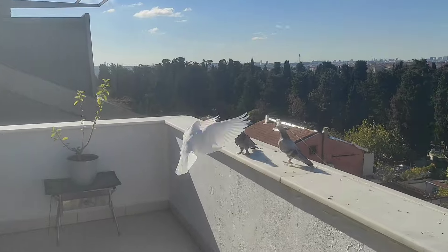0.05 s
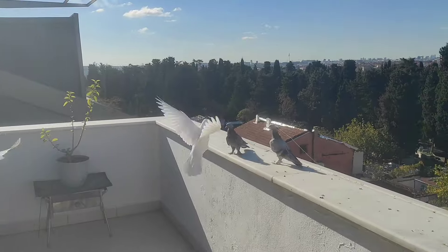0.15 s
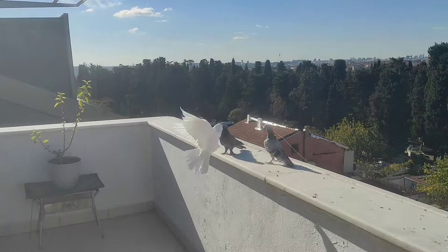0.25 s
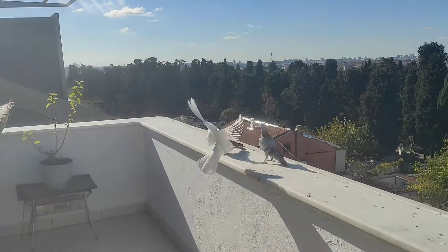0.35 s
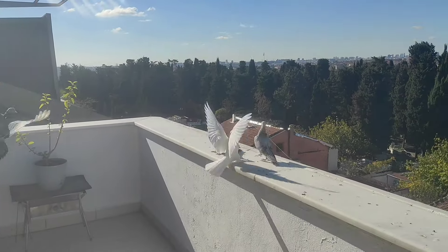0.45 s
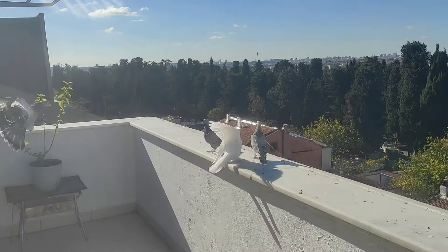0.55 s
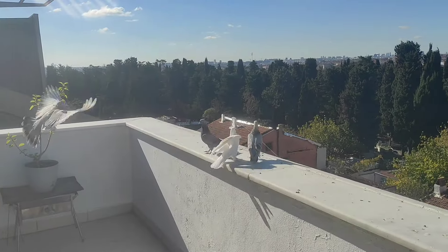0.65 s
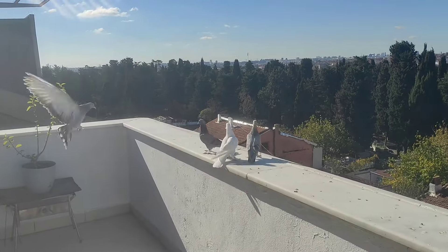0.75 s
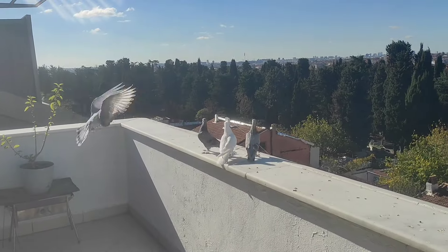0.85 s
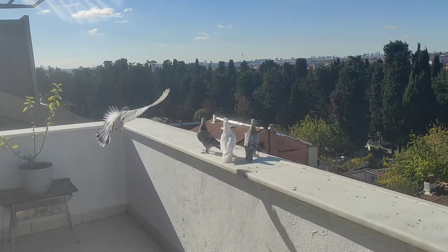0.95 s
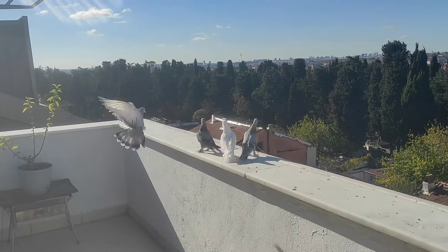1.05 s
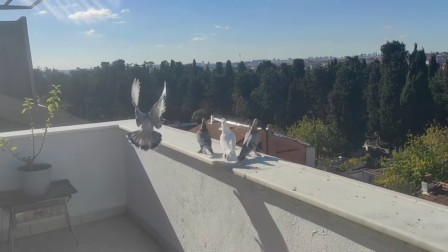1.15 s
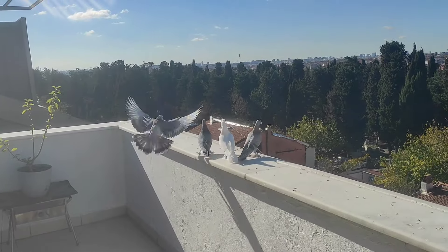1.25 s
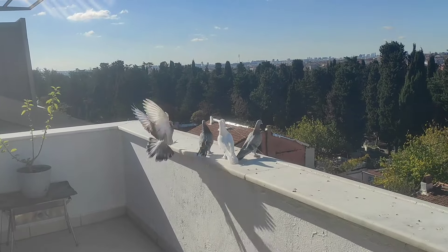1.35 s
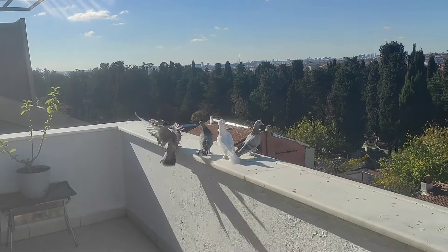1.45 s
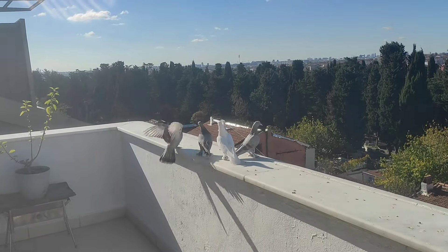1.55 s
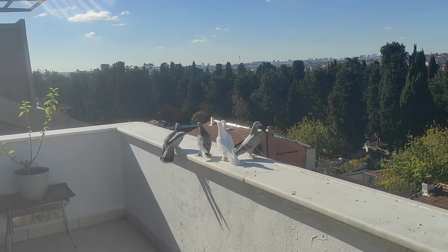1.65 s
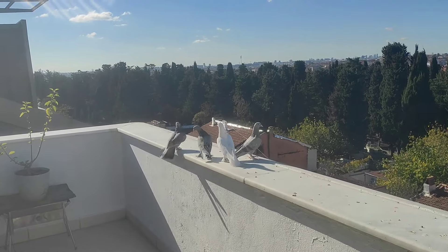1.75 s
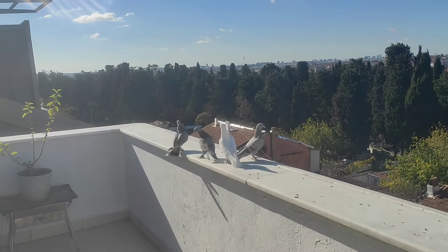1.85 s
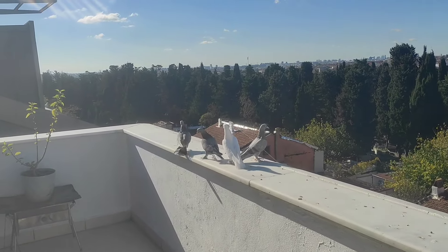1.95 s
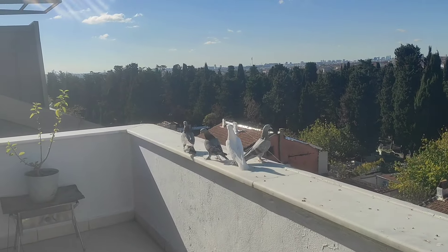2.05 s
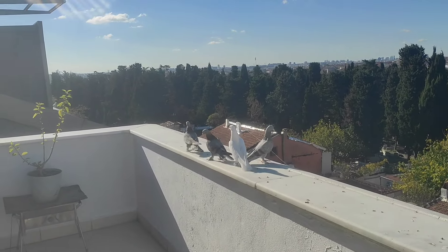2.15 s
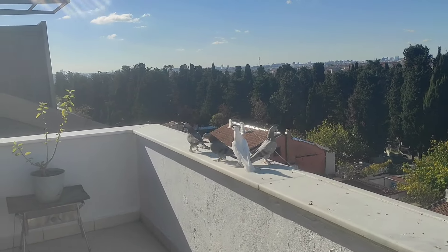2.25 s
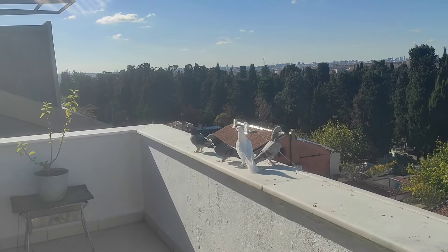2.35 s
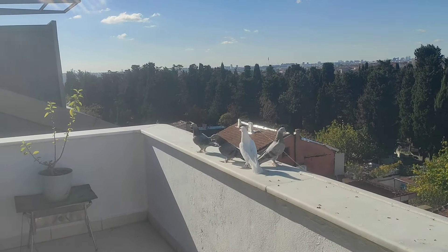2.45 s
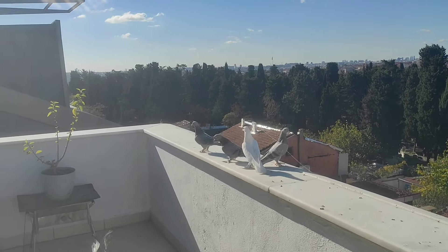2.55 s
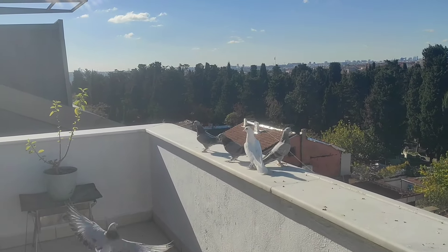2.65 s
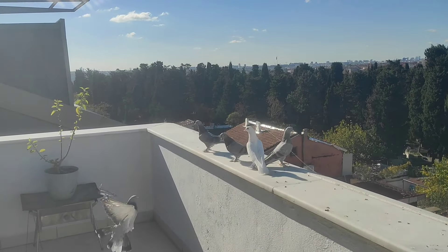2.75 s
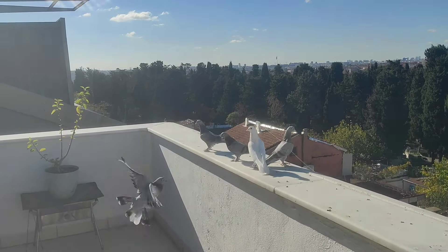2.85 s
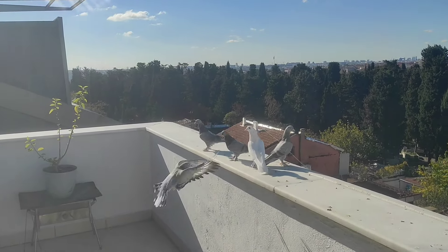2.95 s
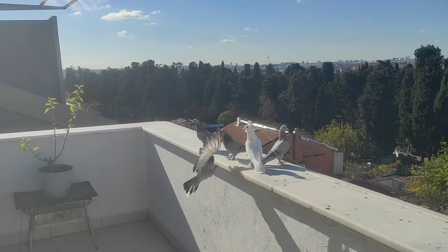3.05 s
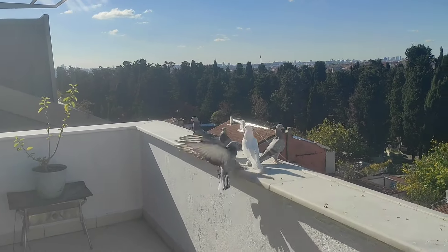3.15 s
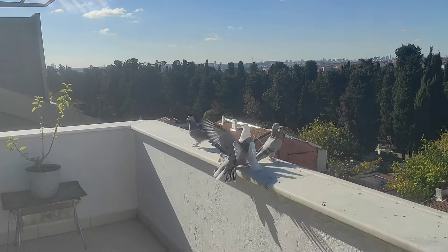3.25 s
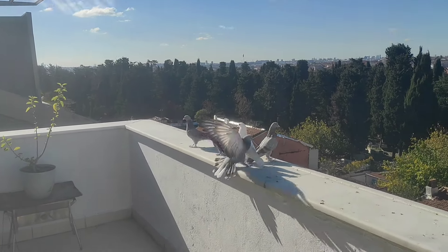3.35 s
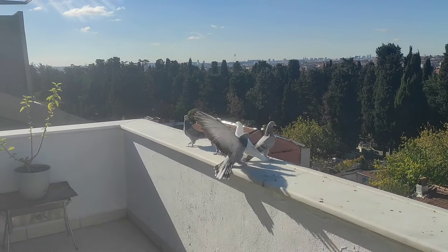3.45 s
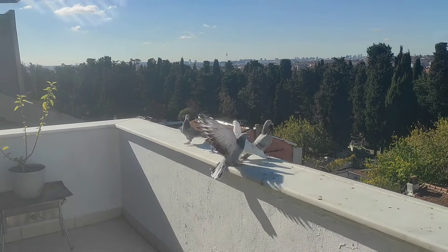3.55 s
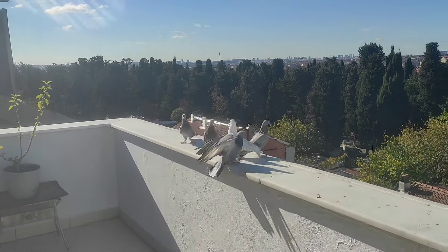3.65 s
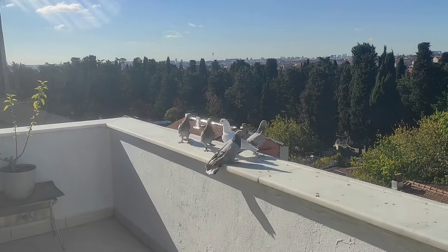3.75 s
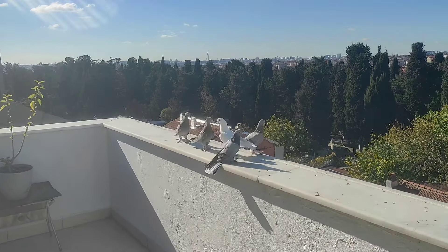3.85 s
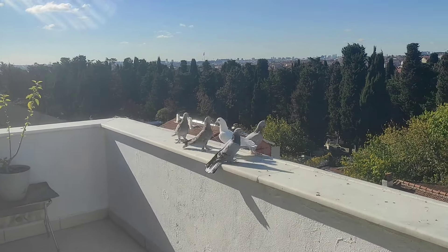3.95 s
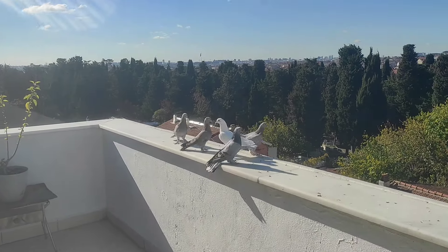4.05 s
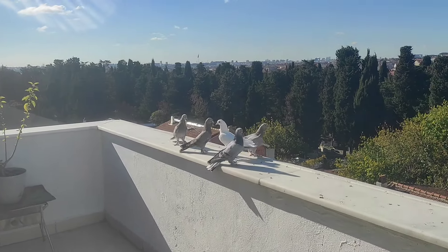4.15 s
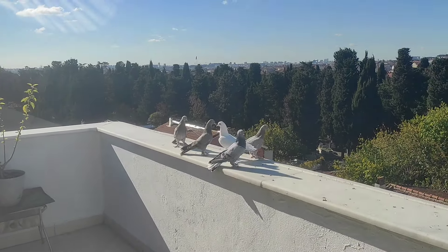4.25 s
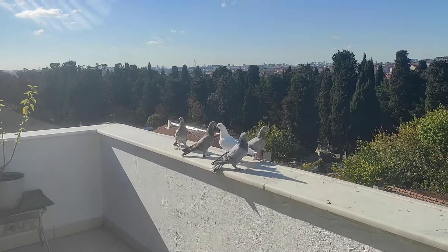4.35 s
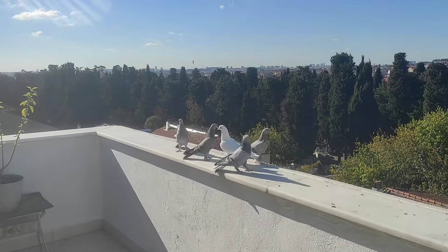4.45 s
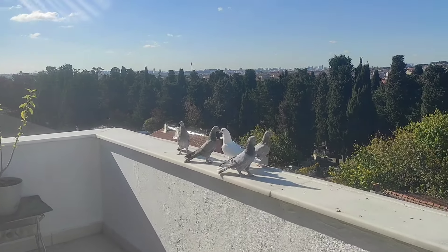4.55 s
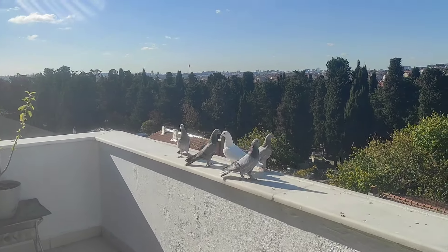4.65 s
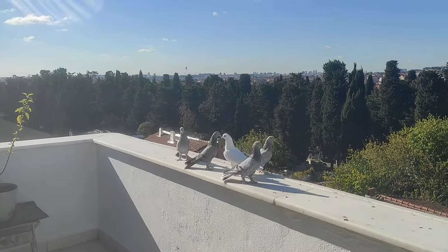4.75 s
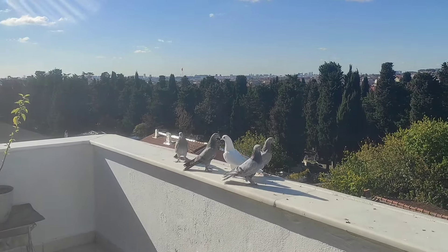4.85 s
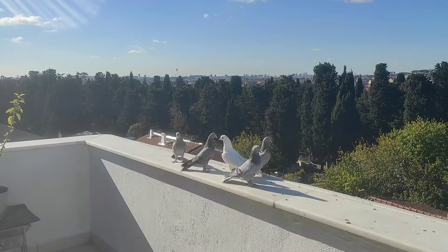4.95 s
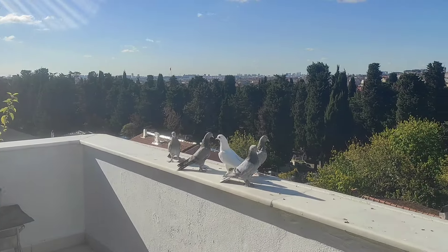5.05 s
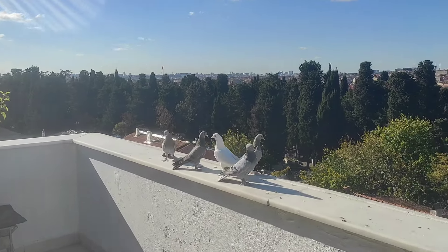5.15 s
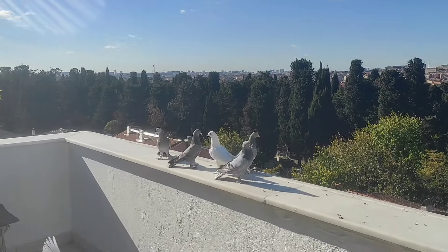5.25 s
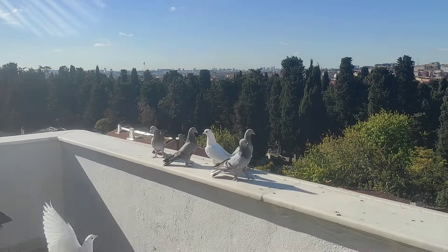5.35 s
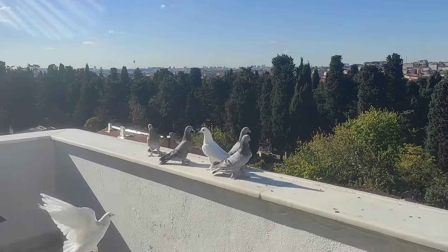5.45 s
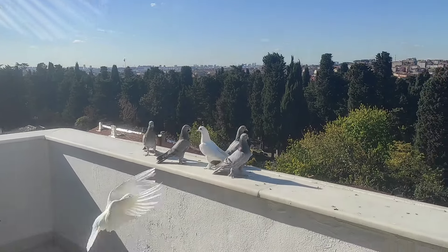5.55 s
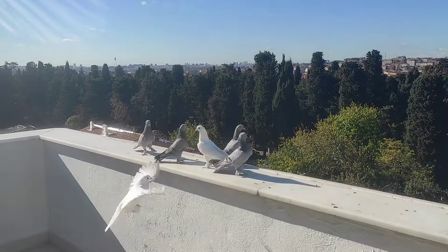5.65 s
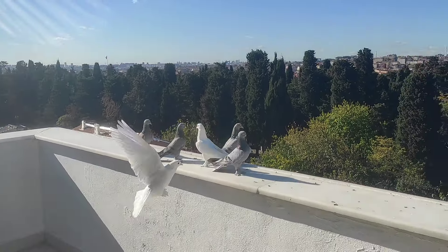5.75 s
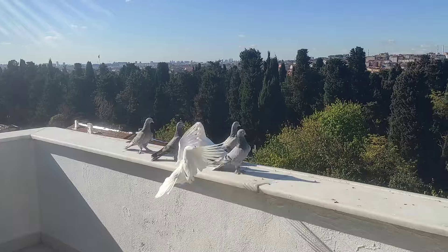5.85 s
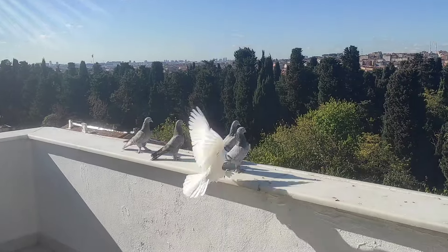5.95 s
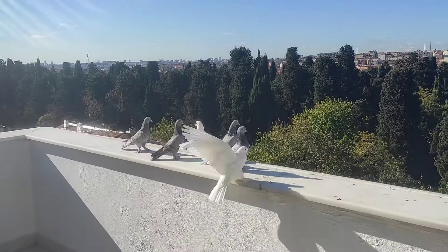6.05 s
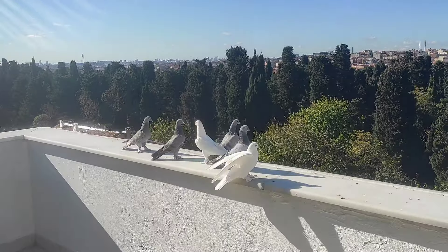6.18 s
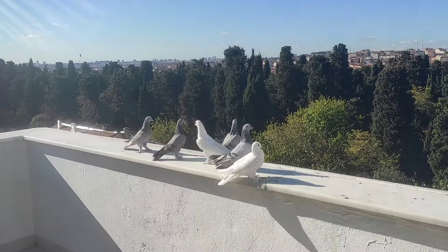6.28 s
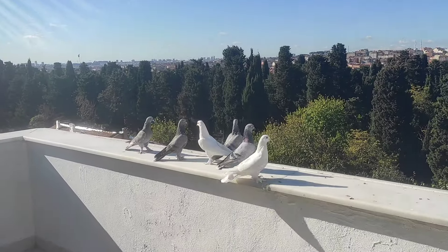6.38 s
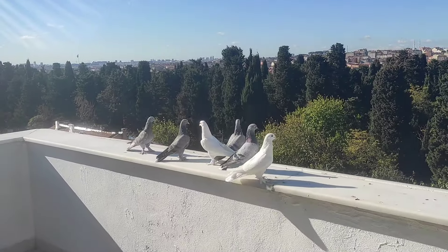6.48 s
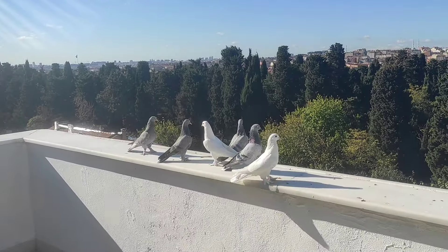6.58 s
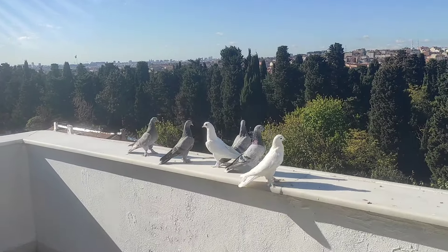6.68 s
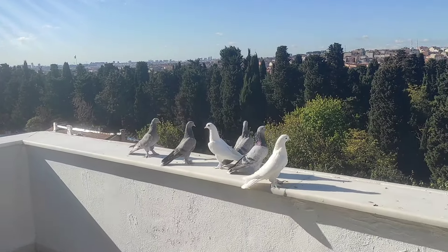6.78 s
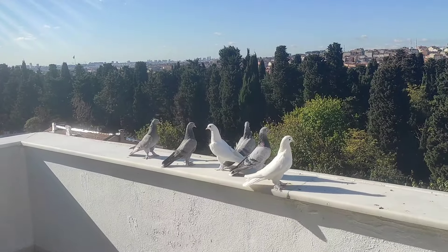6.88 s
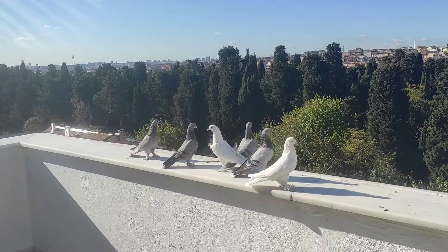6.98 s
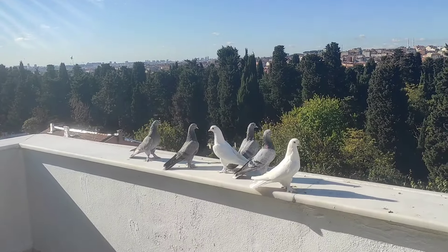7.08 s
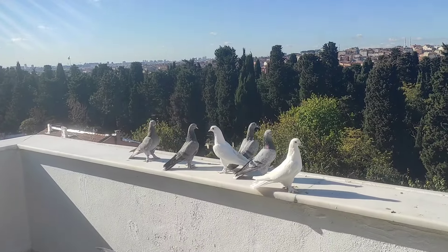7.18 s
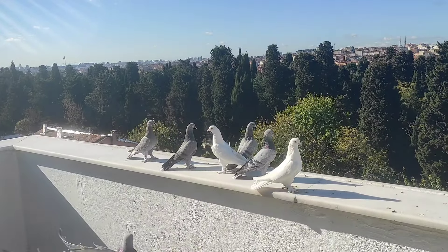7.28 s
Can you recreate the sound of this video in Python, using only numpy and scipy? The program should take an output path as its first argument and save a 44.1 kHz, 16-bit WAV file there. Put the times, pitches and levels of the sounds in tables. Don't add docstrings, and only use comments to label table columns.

```python
import sys
import numpy as np
from scipy import signal
from scipy.fft import rfft, irfft, next_fast_len
from scipy.io import wavfile
from scipy.ndimage import uniform_filter1d, map_coordinates

SR = 44100
rng = np.random.default_rng(int(sys.argv[2]) if len(sys.argv) > 2 else 0)


def wav_out(sig):
    wavfile.write(sys.argv[1], SR, np.round(np.clip(np.atleast_2d(sig).T, -1, 1) * 32767).astype(np.int16))


def invert_db(level):
    return 10 ** (np.asarray(level, dtype=float) / 20)


N = 322710

# (time [s], clap level [dB], delay of the strongest snap [s],
# squeezed air level [dB], downstroke level [dB])
FIRST_BIRDS_BEATS = [
    (0.0014, -26, .0033, -60, -60),
    (0.0576, -20, .0035, -41, -41),
    (0.1829, -17, .0008, -37, -50),
    (0.3176, -21, .013, -40, -55),
    (0.4336, -22.5, .006, -32.5, -55),
    (0.637, -30, .0003, -45, -60),
    (0.8063, -26, .007, -42, -60),
]
THIRD_BIRD_BEATS = [
    (2.3209, -17.5, .0012, -34, -37),
    (2.4387, -15.5, .0033, -34, -41),
    (2.5593, -7.5, .0026, -30, -33),
    (2.6773, -9.5, .0038, -24.5, -37.5),
    (2.804, -11, .0007, -29, -42),
    (2.9396, -16.5, .0051, -33, -46),
    (3.072, -11, .0006, -31, -48),
    (3.2015, -19, .0006, -42, -55),
    (3.4984, -30.5, .0055, -48, -60),
    (3.621, -33.5, .0025, -49, -60),
]
WHITE_BIRD_BEATS = [
    (4.952, -30, .014, -39, -46),
    (5.0313, -9, .0022, -26, -39.5),
    (5.1483, -6.5, .0025, -17, -55),
    (5.2622, -3, .003, -19, -52),
    (5.3886, -9, .0062, -26, -60),
    (5.519, -14.5, .0053, -31, -53),
    (5.6538, -15, .0008, -26.5, -60),
    (5.7959, -15, .0068, -24.5, -59),
    (5.9452, -15.5, .0022, -29, -60),
    (6.103, -18.5, .0014, -30.5, -60),
]
LAST_BIRD_BEATS = [
    (6.696, -17, .002, -32, -43),
    (6.788, -26, .006, -32, -41),
    (6.9254, -20.5, .0042, -32, -52),
    (7.0449, -14, .005, -24, -39),
    (7.1645, -13.5, .0066, -22, -41),
    (7.2879, -13, .0017, -23.5, -50),
]
BEATS = FIRST_BIRDS_BEATS + THIRD_BIRD_BEATS + WHITE_BIRD_BEATS + LAST_BIRD_BEATS
# (time [s], level [dB], delay of the strongest snap [s],
# left minus right [dB])
WING_TIP_BRUSHES = [(0.5577, -35, .0024, 2), (0.9606, -29, .004, -1), (1.2633, -36, .012, 6),
                    (1.3975, -35.5, .011, -2.5), (2.629, -26, .0066, -3), (3.7464, -37.5, .0103, 1),
                    (3.8925, -43, .0047, -8), (4.029, -36, .0008, -13), (4.572, -33.5, .007, -19),
                    (4.87, -41, .012, -6), (4.913, -28, .005, -1), (6.6506, -35.5, .0049, -6),
                    (6.8075, -18, .0018, 1), (6.9651, -28, .009, -6)]
# (frequency [Hz], level per Hz [dB])
SNAP_TONE = [(300, -83), (1500, -1), (3000, -5), (6000, 2), (10000, 3.5), (16000, 0.5)]
SPREAD_S, SPREAD_S_PER_DB = .004, .00022
SECOND_SNAP = .7
BUILD_UP = .75


def claps():
    add, t = np.zeros((2, N + SR)), np.arange(SR // 20) / SR
    beats = [(s, db, main, flight(s)[3]) for s, db, main, *_ in BEATS]
    for s, db, main, pan_db in beats + WING_TIP_BRUSHES:
        spread = SPREAD_S - SPREAD_S_PER_DB * db
        second = main + SECOND_SNAP * spread
        late = np.r_[1.2 * rng.random(14), 1.2 + 3 * rng.random(8)]
        at = np.r_[0, max(main, 0), max(second, 0), max(spread, .002) * late]
        uneven = np.minimum(0.34 * invert_db(3.3 * rng.standard_normal(22) - 2.73 * late), .45)
        uneven = uneven * np.where(at[3:] < main, BUILD_UP, 1)
        size = np.r_[.3, 1.05, .6 * invert_db(-200 * second), uneven]
        gate = sum(a * np.exp(-np.abs(t - s0) / 0.0005) * (t >= s0) for a, s0 in zip(size, at))
        x, *own = gate * np.sign(rng.standard_normal((3, len(t))))
        place(add, s, x, 1.6 * np.array(own), invert_db(db - 8.6), pan_db + 4.5, wet_db=-0.5)
    return causal(add[:, :N], SNAP_TONE)


# (frequency [Hz], level per Hz [dB])
PUFF_TONE = [(95, -24), (220, 9.5), (600, 2), (3000, -3), (5000, -6.5), (9000, -12.5)]
PUFF_S, PUFF_FOLLOWS = .0038, .4
PUFF_HZ, PUFF_HZ_PER_DB, PUFF_LENGTH_S, PUFF_S_PER_DB = 1250, 18, .009, .0004


def thumps():
    add, t = np.zeros((2, N + SR)), np.arange(SR // 20) / SR
    f = np.fft.rfftfreq(len(t), 1 / SR)
    for clap_s, _, main, db, _ in BEATS:
        s = clap_s + PUFF_S + PUFF_FOLLOWS * min(main, .007)
        centre_hz = PUFF_HZ + PUFF_HZ_PER_DB * (db + 20)
        length = PUFF_LENGTH_S - PUFF_S_PER_DB * (db + 20)
        rise = .4 * np.clip(length, .003, .03)
        swell = (t / rise * np.exp(1 - t / rise)) ** 2
        band = invert_db(-7 * np.log2((f + 30) / centre_hz) ** 2) + 0.4
        air_jets = rng.standard_normal((3, len(t)))
        air_jets[0, round(rise * SR)] = 9
        x, *own = swell * unit(irfft(rfft(air_jets) * band, len(t)))
        puff = x / np.linalg.norm(x) * np.linalg.norm(swell)
        place(add, s - rise, puff, 0.7 * np.array(own), invert_db(db + 2), 2.9, wet_db=-3)
    return causal(add[:, :N], PUFF_TONE)


# (time [s], level [dB], centre [Hz], hiss minus level [dB], length [s])
FEATHER_SWEEPS = [(0.316, -43.5, 557, 11, .025), (2.352, -33, 785, 7, .036), (2.422, -38.5, 385, 3, .036),
                  (2.482, -36, 412, 10, .037), (2.975, -42, 360, 14, .058), (3.113, -40, 389, 14, .043),
                  (3.241, -46.5, 397, 11.5, .053), (4.924, -55.5, 353, 19.5, .12),
                  (6.808, -44.5, 845, 21, .026), (6.894, -35.5, 735, 7.5, .038),
                  (6.958, -40, 540, 13, .035), (7.259, -37.5, 520, 8.5, .057)]
# (frequency [Hz], level per Hz [dB])
FEATHER_TONE = [(300, -6), (1000, 16), (2500, 6), (5000, -6.5), (9000, -8.5), (16000, -3.5)]
DOWN_S, DOWN_HZ, DOWN_HISS_DB, DOWN_LENGTH_S = .046, 780, -9, .035
BRAKE_S, BRAKE_PERIOD_S, BRAKE_DB, BRAKE_HZ, BRAKE_HISS_DB = .559, .152, -45, 750, -1


def strokes():
    out, hiss_gain = np.zeros((2, N + SR)), np.zeros(N + SR)
    t = np.arange(SR // 6) / SR
    f = np.fft.rfftfreq(len(t), 1 / SR)
    down = [(s + DOWN_S, db, DOWN_HZ, DOWN_HISS_DB, DOWN_LENGTH_S) for s, *_, db in BEATS[:-1]]
    brake = [(BRAKE_S + k * BRAKE_PERIOD_S, BRAKE_DB, BRAKE_HZ, BRAKE_HISS_DB, .05) for k in range(7)]
    for s, db, centre_hz, hiss_db, length in FEATHER_SWEEPS + brake + down:
        u = t / (np.clip(length, .01, .1) * 0.24)
        swell = u * np.exp(1 - u)
        band = 1 + ((f - centre_hz) / (0.15 * centre_hz)) ** 2
        a, b = irfft(rfft(rng.standard_normal((2, len(t)))) / band, len(t))
        pair = unit(np.array([a + .25 * b, np.roll(a - .25 * b, -8)]))
        i = round(s * SR)
        out[:, i:i + len(t)] += invert_db(db + 7) * swell * pair
        hiss_gain[i:i + len(t)] += invert_db(db + hiss_db - 3) * swell
    hiss = invert_db(1.2 * wobble(150)) * rush(FEATHER_TONE, lead=-8.5, patchy_db=-1.0)
    return out[:, :N] + hiss_gain[:N] * hiss


# (time [s], level [dB])
CLAW_TICKS = [
    (3.898, -23),
    (4.03, -27),
]
# (frequency [Hz], level per Hz [dB])
CLAW_TONE = [(6000, -30), (11000, -6), (15000, 0)]


def claws():
    blows = np.zeros(N)
    for s, db in CLAW_TICKS:
        blows[round(s * SR)] = invert_db(db)
    return causal(blows, CLAW_TONE)


# (time [s], feather rustle level [dB])
WING_EFFORT = [(0, -38), (0.6, -48), (1.49, -47.5), (1.85, -70), (2.2, -60), (2.34, -41), (2.63, -36),
               (3.1, -49), (3.6, -50), (3.99, -80), (4.32, -53), (4.9, -53), (5.09, -38.5), (6.18, -56),
               (6.46, -84), (6.71, -42), (6.93, -34), (7.32, -43)]
# (frequency [Hz], level per Hz [dB])
DRAUGHT_TONE = [(80, -21), (160, 5.5), (250, 4), (450, -1.5), (900, -10.5), (2000, -60)]
BREEZE_DB = -51.5


def air():
    rustle_db, = curves(WING_EFFORT)
    stirred = invert_db(BREEZE_DB) + invert_db(rustle_db + curves(FLIGHT_PLACES)[3])
    flutter = 3 * wobble(120)
    rustle_gain = invert_db(rustle_db + 0.5 + 0.5 * wobble(11) + flutter)
    rustle = rustle_gain * rush(FEATHER_TONE, lead=-8.5, patchy_db=4.0)
    return rustle + stirred * invert_db(9.5 + 1.26 * wobble(9)) * rush(DRAUGHT_TONE, lead=0, patchy_db=1.5)


# (time [s], rumble level [dB])
TOWN_RUMBLE = [(0, -53), (1.5, -56), (2.3, -59), (2.87, -59), (3.2, -49), (3.42, -57), (4.7, -56),
               (5.1, -46), (5.6, -47), (6.4, -57), (7.32, -48)]
# (frequency [Hz], level per Hz [dB])
RUMBLE_TONE = [(15, -30), (30, 2.5), (55, -6), (80, -11), (110, -12), (140, -31), (300, -38.5)]
TRAFFIC_TONE = [(120, -2), (220, -4.5), (500, -5), (1200, -2.5), (2300, -15.5), (3200, -23), (5500, -30.5),
                (8000, -38), (16000, -34)]
# (time [s], pitch [Hz], level [dB])
LEAVING_ENGINE = [
    (0, 111, -59),
    (1.7, 108.8, -58),
    (1.85, 107.2, -55.5),
    (2.63, 106.8, -56),
    (2.74, 104, -74),
    (2.96, 104, -56),
    (3.35, 97, -70),
]
TRAFFIC_DRONE = [(0, 54, -55), (0.6, 57, -58), (1.4, 52, -56), (1.93, 57, -52), (2.1, 58, -68),
                 (2.38, 53.2, -53), (3.42, 53.9, -54.5), (4.09, 55.9, -50.5), (4.5, 52, -56),
                 (4.75, 48, -68), (5.25, 56, -51), (5.6, 58, -59), (6.19, 53, -57), (6.56, 53.5, -62),
                 (6.87, 59, -52), (7.1, 52, -50), (7.32, 53, -60)]
PASSING_ENGINE = [
    (5.4, 58, -60),
    (5.75, 67.8, -55),
    (6.0, 72, -67),
    (6.44, 81.5, -56),
    (6.7, 72, -55),
    (6.8, 67, -64),
    (7.3, 51.5, -64),
]


def town():
    leaving = tone(LEAVING_ENGINE, zip((1, 1.5, 2, 2.5, 4), (0.0, -4, 1.5, -9.5, -6)))
    drone = tone(TRAFFIC_DRONE, [(1, -0.64)])
    passing = tone(PASSING_ENGINE, zip((1, 2), (-.5, -5)))
    far = invert_db(-41 + 0.23 * wobble(0.99)) * rush(TRAFFIC_TONE, lead=21.25, patchy_db=0.5)
    rumble = invert_db(curves(TOWN_RUMBLE)[0] + 6.5) * rush(RUMBLE_TONE, lead=21.7, patchy_db=4.0)
    return far + rumble + leaving + drone + passing


def tone(rows, orders):
    pitch_hz, db = curves(rows)
    t = np.arange(N) / SR
    on = np.clip(np.minimum(t - rows[0][0] + .1, rows[-1][0] + .1 - t) / .2, 0, 1)
    turn = 2 * np.pi * np.cumsum(pitch_hz + 0.83 * wobble(5)) / SR
    return on * sum(invert_db(db + level + 13.5 + 0.7 * wobble(8)) * np.sin(k * turn) for k, level in orders)


# (frequency [Hz], likeness [0-1])
PORT_LIKENESS = [(60, 0.96), (200, 0.95), (500, 0.88), (1500, 0.8), (4000, 0.07), (10000, 0.03)]


def rush(spectrum, lead, patchy_db):
    z = signal.stft(rng.standard_normal((2, N + 512)), nperseg=512)[2]
    field = uniform_filter1d(rng.standard_normal(z.shape[1:]), size=6, axis=0)
    field = uniform_filter1d(field, size=10, axis=1)
    patchy = signal.istft(z * invert_db(patchy_db * unit(field)), nperseg=512)[1]
    pair = rfft(patchy, next_fast_len(N + 512))
    hz = np.linspace(0, SR / 2, pair.shape[1])
    turn = np.arccos(np.clip(along(PORT_LIKENESS, hz), 0, 1)) / 2
    mid, side = pair * invert_db(along(spectrum, hz)) * [np.cos(turn), np.sin(turn)]
    shift = np.exp(1j * np.pi * hz * lead / SR)
    return unit(irfft(np.array([(mid + side) * shift, (mid - side) / shift]))[:, :N])


# (from time [s], left port late by [samples], change of wall level [dB],
# left minus right [dB], draught minus rustle [dB])
FLIGHT_PLACES = [
    (0, 7, 2, -3, -20),
    (2.2, 8, 0, -1.5, -13),
    (4.8, 20.5, -.5, -4.5, -17),
    (5.45, 7.5, -1, -2, -14),
    (6.5, 0.5, 0.5, -4, -13),
]


def flight(s):
    return [row for row in FLIGHT_PLACES if row[0] <= max(s, FLIGHT_PLACES[0][0])][-1]


FAR_WALL_S, FAR_WALL_DB = .02, -14


def place(add, s, x, own, level, pan_db, wet_db):
    i = max(round(s * SR), 0)
    _, lag, wall_db, *_ = flight(s)
    heard = np.zeros((2, SR // 2))
    direct = np.array([np.roll(x, round(lag)), x]) + own
    heard[:, :len(x)] = invert_db([[pan_db / 2], [-pan_db / 2]]) * direct
    wet = walls(x, ragged_db=3.3)
    heard[:, 130:130 + wet.shape[1]] += invert_db(wet_db + wall_db) * wet
    heard[:, round(FAR_WALL_S * SR):][:, :len(x)] += invert_db(FAR_WALL_DB + wall_db) * own[::-1]
    add[:, i:i + SR // 2] += level * heard


# (frequency [Hz], time to fall by 60 dB [s])
WALL_DECAY = [(200, 0.44), (1000, 0.26), (4000, 0.21), (8000, 0.19), (14000, 0.082)]


def walls(x, ragged_db):
    hz, t, z = signal.stft(rng.standard_normal((2, SR // 4)), SR, nperseg=256)
    lumps = invert_db(ragged_db * rng.standard_normal(len(t)))
    decay = invert_db(-60 * t / along(WALL_DECAY, hz)[:, None])
    tail = signal.istft(z * lumps * decay, SR, nperseg=256)[1]
    tail = tail * (1 - np.exp(-np.arange(tail.shape[1]) / (0.00067 * SR)))
    return signal.fftconvolve(x[None], tail / np.linalg.norm(tail[0]), axes=1)


def unit(x):
    return x / np.sqrt(np.mean(x ** 2) + 1e-20)


def along(points, hz):
    f, v = np.transpose(points)
    return np.interp(np.log(hz + 1), np.log(f + 1), v)


def curves(rows):
    s, *cols = np.transpose(rows)
    return [np.interp(np.arange(N) / SR, s, c) for c in cols]


def wobble(rate):
    knots = rng.standard_normal(int(N * rate / SR) + 4)
    return map_coordinates(knots, [np.arange(N) * rate / SR])


def causal(x, spectrum):
    cep = irfft(np.log(invert_db(along(spectrum, np.fft.rfftfreq(4096, 1 / SR)))))
    cep[1:2048], cep[2049:] = 2 * cep[1:2048], 0
    h = irfft(np.exp(rfft(cep)))[:2048]
    h = (h / np.linalg.norm(h)).reshape((1,) * (x.ndim - 1) + (-1,))
    return signal.fftconvolve(x, h, axes=-1)[..., :x.shape[-1]]


def scene():
    return claps() + thumps() + strokes() + claws() + air() + town()


def top_cut(x):
    return signal.sosfilt(signal.butter(12, 16500, fs=SR, output="sos"), x)


# (frequency [Hz], left level [dB], right level [dB])
PORT_TONE = [(50.3, -14, -17), (1500, -14.5, -14.5), (4200, -7.5, -6), (5470, -8, -4.5), (6510, -11, 2),
             (7390, -1, 8), (8430, 4, 1.5), (8960, 1, -3.5), (10410, -18.5, -11.5), (13300, -19, -20.5),
             (14700, -22, -13), (15700, -50, -48), (17000, -45.5, -64)]
# (left [dB], right [dB])
PORT_GAIN = (-2, -.5)


def record(dry):
    ports = np.array(PORT_TONE)
    heard = np.array([causal(dry[c], ports[:, [0, c + 1]]) * invert_db(PORT_GAIN[c]) for c in range(2)])
    return top_cut(heard)


dry = scene()
out = record(dry)
wav_out(out)
```